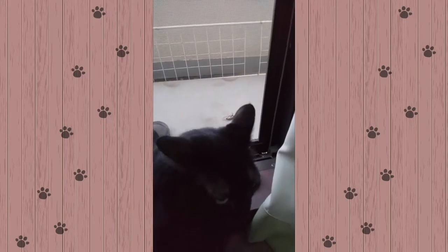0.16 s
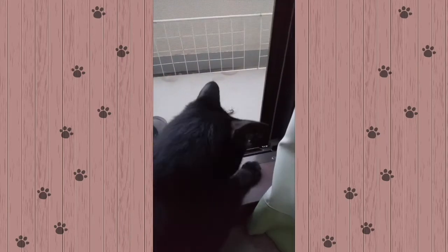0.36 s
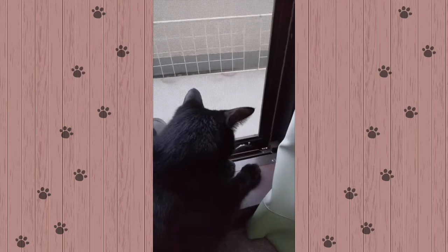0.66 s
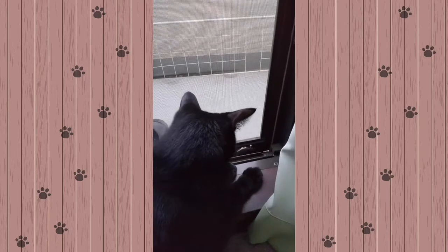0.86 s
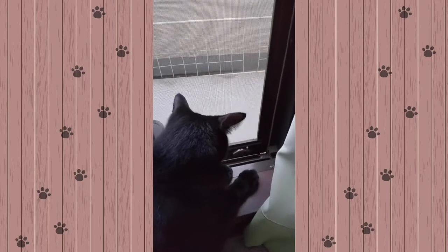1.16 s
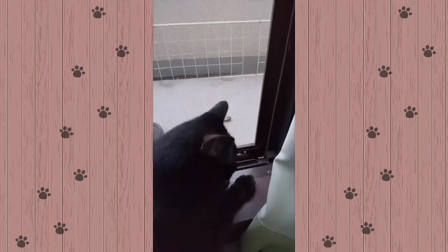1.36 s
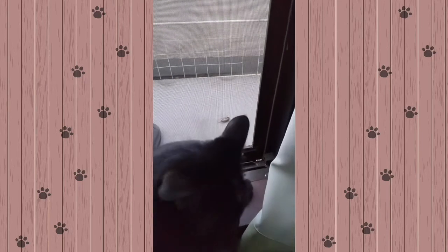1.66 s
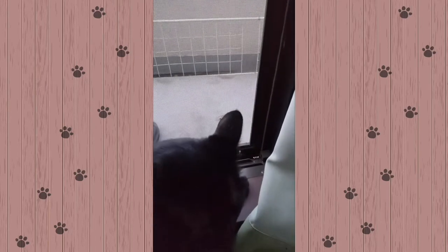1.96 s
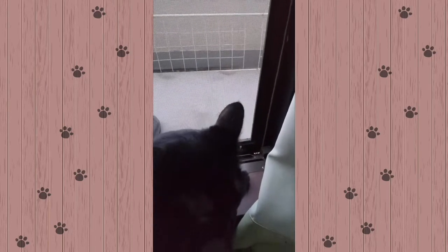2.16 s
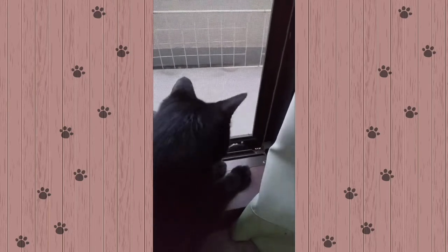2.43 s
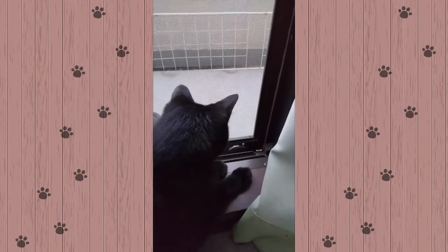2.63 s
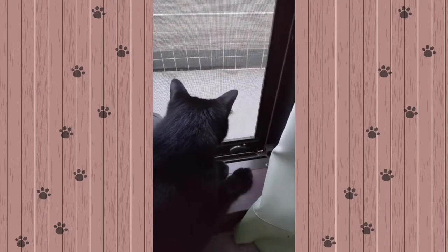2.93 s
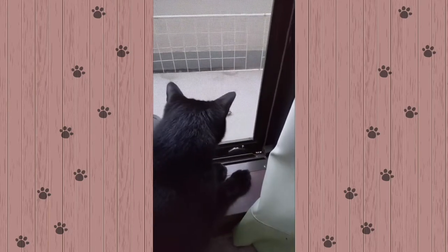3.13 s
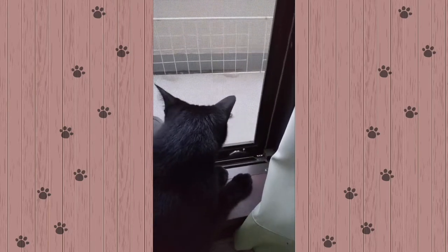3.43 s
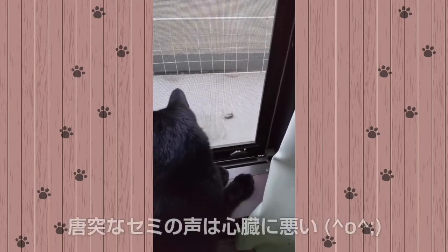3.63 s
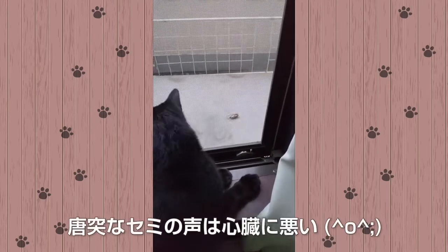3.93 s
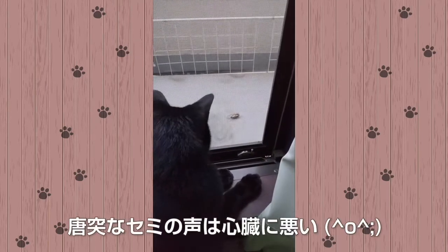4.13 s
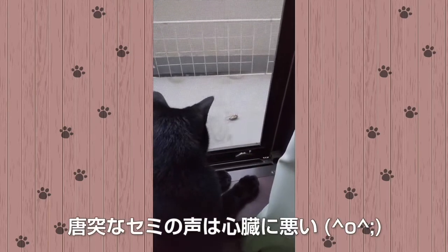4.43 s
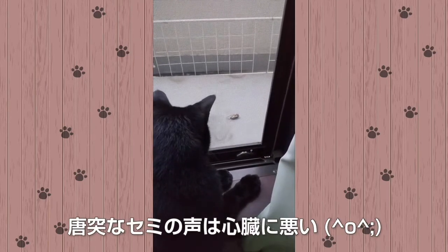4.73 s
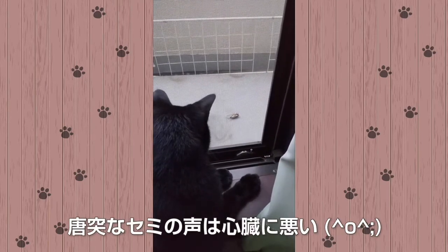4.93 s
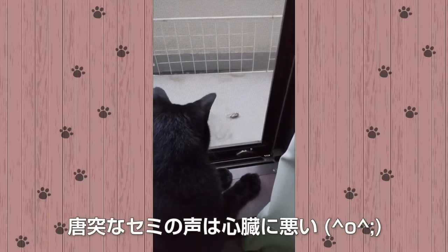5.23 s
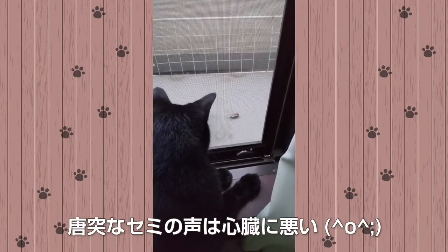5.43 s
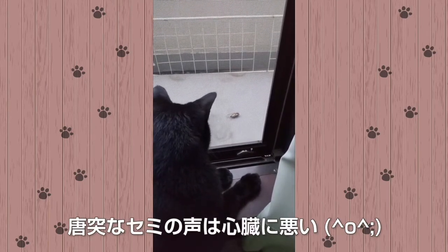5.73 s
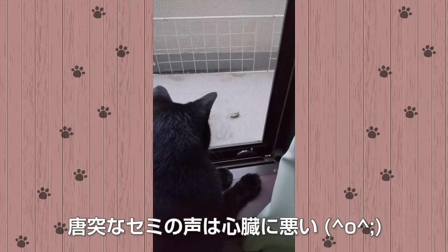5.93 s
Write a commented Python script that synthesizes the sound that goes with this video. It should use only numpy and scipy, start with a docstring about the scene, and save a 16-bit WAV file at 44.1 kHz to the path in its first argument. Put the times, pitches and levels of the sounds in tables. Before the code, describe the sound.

Just inside an open balcony door, a cicada lying on concrete gives a loud, harsh, rattling buzz. It brightens and strengthens a little in the first second, then holds with slight wavering. Near four seconds it breaks into a few tiny rasps and stops. Beneath is a deep, soft town rumble and a faint far hiss of insects. Hand-held microphone, mono, with short hard balcony reflections.

```python
"""Cicada failing on a balcony

Heard from just inside the open door: a cicada lying on concrete buzzes harshly, stutters and stops.
Its two tymbals buckle in turn, rib by rib, as trains of clicks coloured by resonances and smeared
by balcony reflections. In the distance, shaped noise gives a low town rumble and roar and a faint
chorus of far cicadas. The microphone is hand-held and the sound is mono, alike in both channels.
"""
import sys
import numpy as np
from scipy import signal
from scipy.fft import rfft
from scipy.io import wavfile
from scipy.ndimage import uniform_filter1d

SR = 44100
rng = np.random.default_rng(int(sys.argv[2]) if len(sys.argv) > 2 else 0)


def transcribe(signal):
    """Save signal, clipped to [-1, 1], as a 16-bit WAV file at the path in sys.argv[1]."""
    frames = np.atleast_2d(signal).T
    limited = np.clip(frames, -1, 1)
    pcm = np.round(limited * 32767).astype(np.int16)
    wavfile.write(sys.argv[1], SR, pcm)


N = 268128
T = np.arange(N) / SR  # time [s]

# Deep town rumble, relative spectrum: (frequency [Hz], level [dB])
RUMBLE_SPECTRUM = [(20, -40), (33, -42), (40, -8.5), (46, -5), (52, -1.5), (60, 1.5), (70, -5), (86, -15),
                   (113, -11), (135, -19), (200, -57), (500, -100)]
# Low town roar, relative spectrum: (frequency [Hz], level [dB])
ROAR_SPECTRUM = [(30, -42), (90, -12.5), (150, 1), (190, -3.5), (235, 0.5), (280, -5), (400, -8),
                 (530, -12), (720, -10.5), (950, -19), (1400, -18), (2000, -26.5), (4000, -36),
                 (14000, -58)]
# Far cicadas, relative spectrum: (frequency [Hz], level [dB])
CHORUS_SPECTRUM = [(1180, -49), (2000, -7), (2070, -7), (2350, 1), (2660, 3), (3450, -13), (3770, -14),
                   (4300, -8), (5530, -9), (6300, -16), (7600, -16), (8310, -20), (14000, -20)]
# Broad colour of a rib click, relative spectrum: (frequency [Hz], level [dB])
CLICK_SPECTRUM = [(500, -43), (1200, -25), (2170, -17.5), (2370, -6), (3300, -3), (3480, -10), (4300, -5),
                  (5200, -2), (6200, -5), (7000, -8), (7900, -5.5), (9800, -20), (13000, -24.5),
                  (14300, -24.5)]
# Sharp resonances of the corner where the insect lies: (frequency [Hz], width [Hz], lift [dB])
CORNER_RESONANCES = [(1500, 85, 8.5), (1773, 66, 7), (1943, 70, 6), (2041, 48, 10.5), (2346, 58, 9),
                     (2490, 39, 4.5), (2667, 39, 4.5), (2880, 34, 5), (2949, 49, 7), (3094, 22, 6.5),
                     (3174, 33, 7.5), (3694, 54, 8), (3980, 80, 3), (4420, 52, 2), (4537, 100, 5.5),
                     (4807, 77, 4.5), (4890, 75, 7), (4960, 67, 1), (5400, 145, 4.5), (5920, 44, 2.5),
                     (5990, 114, 4.5), (6567, 143, 6.5), (7504, 77, 8), (7655, 136, 8.5)]
# Shift of colour with the abdomen fully stretched: (frequency [Hz], width [Hz], lift [dB])
ABDOMEN_RESONANCES = [(2340, 200, 2), (3564, 200, 4.5), (4564, 69, 7), (4950, 220, 5), (5300, 230, 2.5),
                      (6700, 166, 11.5), (7660, 220, -7.5)]
# Decay time of the balcony's tail, by 60 dB: (frequency [Hz], decay time [s])
BALCONY_DECAY = [(1500, 0.22), (5000, 0.2), (12000, 0.18)]
# Short rasps as the buzz breaks up: (time [s], length [s], level [dB], growth over the run [dB])
RASP_RUNS = [(3.848, 0.02, -28, 2), (3.896, .021, -27.5, 7), (3.928, .02, -28, -2), (3.951, .009, -35, -4),
             (3.990, .011, -25, 7), (4.072, .007, -28.5, -1), (4.084, .0085, -29, 4),
             (4.283, .0081, -30.5, 12)]

RUMBLE_DB, ROAR_DB, CHORUS_DB = -39, -47.7, -62
SINK_AT_S, SINK_S, SINK_DB = 3.8, 1.0, -2.6  # rumble and roar sink as the buzz breaks up
SLACK, HELD = .15, .86  # stretch of the abdomen (0-1) at rest and in full song
STRETCH_AT_S, STRETCH_S = 0.53, 0.61  # it stretches once, early in the buzz
RELAX_AT_S, RELAX_S = 3.78, .35  # and relaxes as the song ends
SLACK_DB, STRETCHED_DB = -30, -28.1  # effort of the buzz at stretch 0 and 1
FALTER_AT_S, FALTER_DB = 3.81, -2.5  # the effort flags just before the break
STOP_S = 3.848  # the long buzz breaks up here
PACE_HZ, TIRING_HZ_PER_S = 71.48, 1.2  # contractions of each tymbal muscle, slowing as it tires
WAVER_HZ, WAVER_S = 2.1, .2  # spread of the wandering pace, and time between its new values
RIB_GAP_S = .00113  # mean time between two ribs of one run
EDGE_HZ = 14250  # the recorder's upper band limit


def amp(db):
    """Decibels to gain."""
    return 10 ** (np.asarray(db) / 20)


def unit(x):
    """Scales to rms 1."""
    return x / np.sqrt(np.mean(x ** 2) + 1e-20)


def read(points, hz):
    """Reads a table between its points on a log-frequency axis."""
    f, value = np.transpose(points)
    return np.interp(np.log(hz + 1), np.log(f + 1), value)


def ramp(start_s, length_s):
    """Rises evenly from 0 to 1, then holds."""
    return np.clip((T - start_s) / length_s, 0, 1)


def wander(step_s, size=256):
    """Slow chance: draws of spread 1, one every step, joined by straight lines."""
    return np.interp(T / step_s, np.arange(size), rng.standard_normal(size))


def minimum_phase(log_gain):
    """Causal response with the given log gain: its phase follows from the gain."""
    return np.exp(np.conj(signal.hilbert(log_gain)))


def noise(points):
    """Random noise with the given spectrum, rms 1."""
    gain = amp(read(points, np.fft.rfftfreq(N, 1 / SR)))
    return unit(np.fft.irfft(rfft(rng.standard_normal(N)) * gain, N))


def background(steady_s=0.31):
    """Deep rumble and low roar hold, then sink a little; far cicadas merge into an even hiss."""
    deep = noise(RUMBLE_SPECTRUM)
    # even out the swells of the rumble
    deep /= np.sqrt(uniform_filter1d(deep ** 2, int(steady_s * SR)))
    town = amp(RUMBLE_DB) * deep + amp(ROAR_DB) * noise(ROAR_SPECTRUM)
    town *= amp(SINK_DB * ramp(SINK_AT_S, SINK_S))
    return town + amp(CHORUS_DB) * noise(CHORUS_SPECTRUM)


def abdomen():
    """Stretch 0-1: the abdomen extends, holds through the song, and relaxes."""
    extension = ramp(STRETCH_AT_S, STRETCH_S) - ramp(RELAX_AT_S, RELAX_S)
    return SLACK + (HELD - SLACK) * extension


def place(times, sizes):
    """A train of single-sample clicks."""
    at = np.round(times * SR).astype(int)
    inside = (at >= 0) & (at < N)
    return np.bincount(at[inside], sizes[inside], N)


def lifts(peaks, hz):
    """Bell-shaped resonances, in dB; each width is taken at half the lift."""
    return sum(lift * np.exp(-np.log(2) * (2 * (hz - f) / width) ** 2) for f, width, lift in peaks)


def colour(x, peaks, size=8192):
    """Causal filter of unit energy: the click's broad colour with resonances on top."""
    hz = abs(np.fft.fftfreq(size, 1 / SR))
    log_gain = np.log(amp(read(CLICK_SPECTRUM, hz) + lifts(peaks, hz)))
    taps = np.fft.ifft(minimum_phase(log_gain)).real[:size // 2]
    return signal.oaconvolve(x, taps / np.linalg.norm(taps))[:N]


def radiate(clicks, stretch, slack_peaks):
    """Blends the colour of the slack insect with the full ring of its stretched abdomen."""
    stretch = np.clip(stretch, 0, 1)
    slack = colour(clicks * (1 - stretch), slack_peaks)
    stretched = colour(clicks * stretch, CORNER_RESONANCES + ABDOMEN_RESONANCES)
    return slack + stretched


def buzz(slip_s=.00022, rib_slip_s=.00016, lag=.48, weaker_db=-1.6, rib_fade_db=-1.0,
         uneven_db=1.06, count=6):
    """Two tymbals pull in turn; each pull snaps a quick, uneven run of ribs. Stretching makes it louder."""
    stretch = abdomen()
    effort_db = SLACK_DB + (STRETCHED_DB - SLACK_DB) * stretch
    effort_db += FALTER_DB * (T > FALTER_AT_S)
    pace = PACE_HZ - TIRING_HZ_PER_S * T + WAVER_HZ * wander(WAVER_S)
    turns = np.cumsum(pace) / SR
    rib = np.arange(count)
    clicks = np.zeros(N)
    # the second tymbal lags by nearly half a turn and is weaker
    for offset, side_db in ((0, 0), (lag, weaker_db)):
        pulls = np.interp(np.arange(int(turns[-1])) + offset, turns, T)[:, None]
        slips, sizes = rng.standard_normal((2, len(pulls), count))
        starts = pulls + slip_s * rng.standard_normal(pulls.shape)
        times = starts + np.cumsum(RIB_GAP_S + rib_slip_s * slips, 1)
        gains = amp(side_db + rib_fade_db * rib + uneven_db * sizes)
        clicks += place(times.ravel(), gains.ravel())
    song = unit(clicks) * amp(effort_db) * (T < STOP_S)
    return radiate(song, stretch, CORNER_RESONANCES)


def reflections(early_db=1.8, early_s=0.0025, build_s=0.0016, even_hz=45, size=16384):
    """A tight cluster of paths round the door frame, then the tail off floor and walls."""
    near, far = rng.standard_normal((2, size))
    hz, t, z = signal.stft(far, SR, nperseg=256)
    decay = amp(-60 * t / read(BALCONY_DECAY, hz)[:, None])
    tail = signal.istft(z * decay, SR, nperseg=256)[1][:size]
    tail = unit(tail * (1 - np.exp(-T[:size] / build_s)))
    early = unit(near * np.exp(-T[:size] / early_s))
    paths = np.fft.fft(tail + amp(early_db) * early)
    # the many paths carry equal power in every band
    power = uniform_filter1d(abs(paths) ** 2, int(even_hz * size / SR) | 1, mode="wrap")
    return np.fft.ifft(paths * minimum_phase(-np.log(power) / 2)).real


def balcony(x, count=4):
    """Fades between sets of reflections: the paths change slowly as the hand-held microphone drifts."""
    position = (count - 1) * T / T[-1]
    wet = np.zeros(N)
    for k in range(count):
        share = np.cos(np.pi / 2 * np.clip(position - k, -1, 1))
        wet += signal.oaconvolve(x * share, reflections())[:N]
    return wet


def rasps(rib_slip_s=.00018, uneven_db=1.0, size=40):
    """The last twitches: each a single run of rib clicks, ringing less as the abdomen relaxes."""
    clicks = np.zeros(N)
    for start, length, db, growth_db in RASP_RUNS:
        slips, sizes = rng.standard_normal((2, size))
        after = RIB_GAP_S * np.arange(size) + rib_slip_s * slips
        gains = amp(uneven_db * sizes + growth_db * after / length) * (after < length)
        # the level is the rms over the length of the run
        gains *= np.sqrt(length * SR) / np.linalg.norm(gains)
        clicks += place(start + after, amp(db) * gains)
    return radiate(clicks, abdomen(), [])


def scene(cicada_db=0):
    """The cicada on its balcony over the background, alike in both channels."""
    cicada = balcony(buzz() + rasps())
    mono = amp(cicada_db) * cicada + background()
    return np.array([mono, mono])


def record(dry):
    """The recorder's steep band limit."""
    taps = signal.firwin(1023, EDGE_HZ, window=("kaiser", 10), fs=SR)
    return signal.oaconvolve(dry, taps[None], "same", axes=1)


dry = scene()
out = record(dry)
transcribe(out)
```